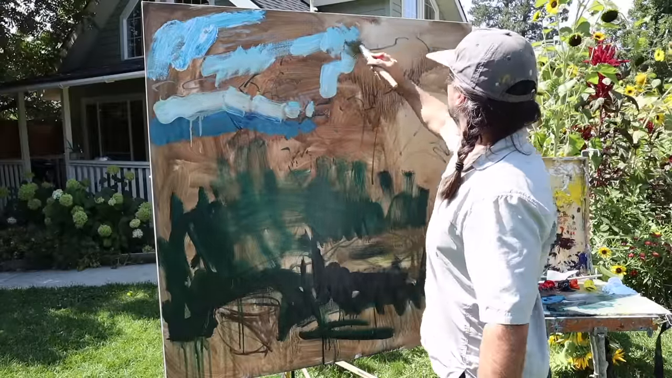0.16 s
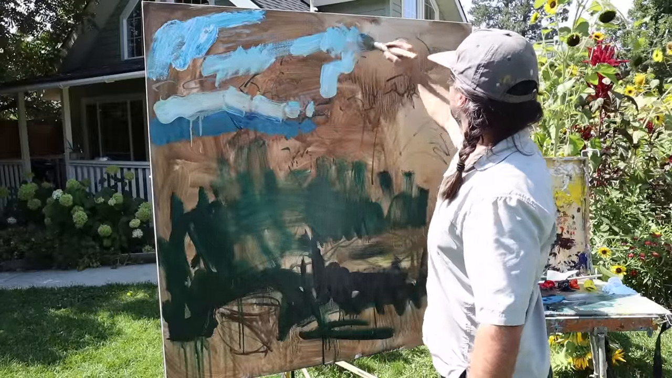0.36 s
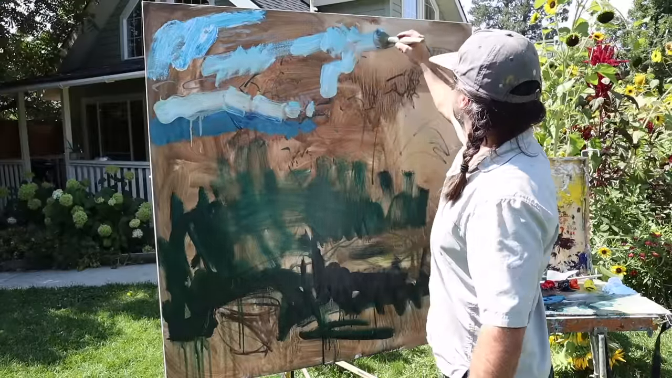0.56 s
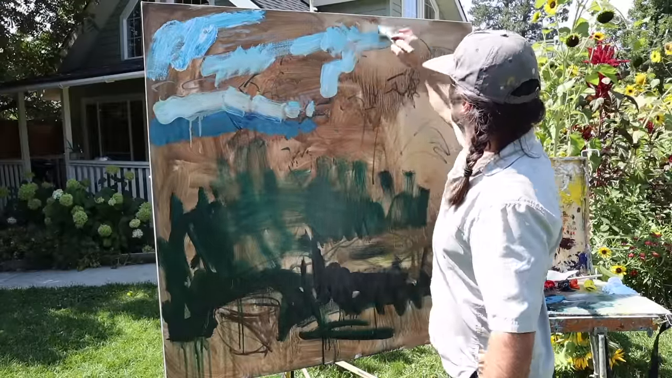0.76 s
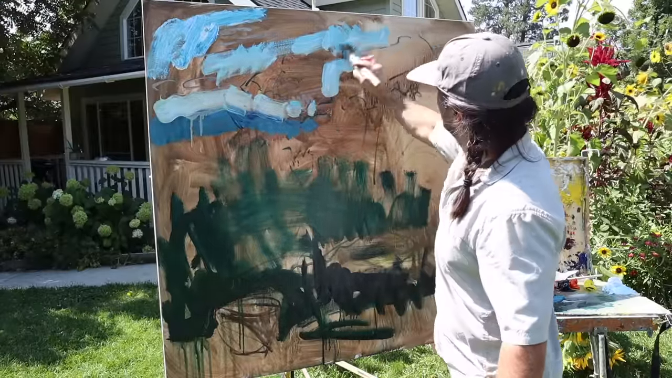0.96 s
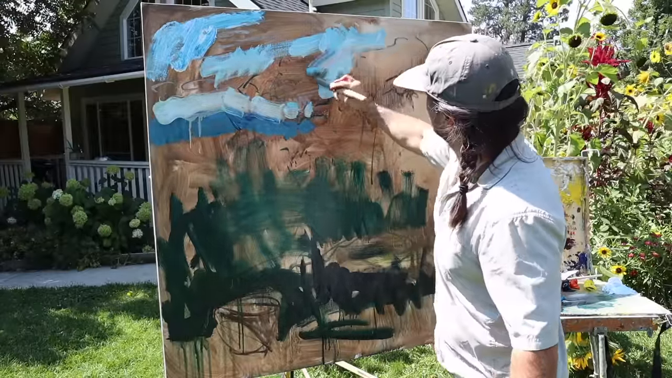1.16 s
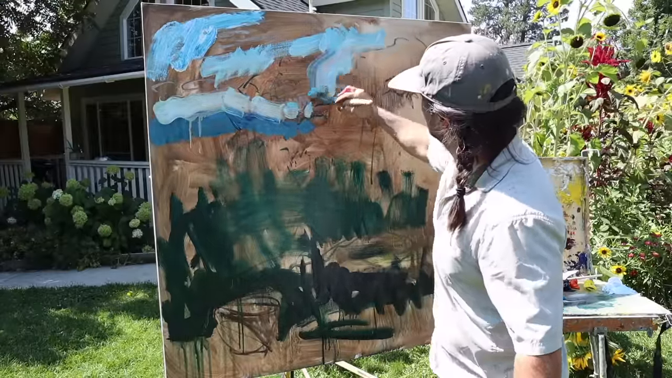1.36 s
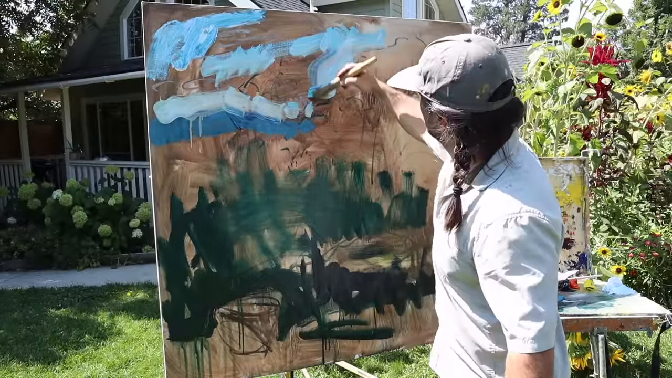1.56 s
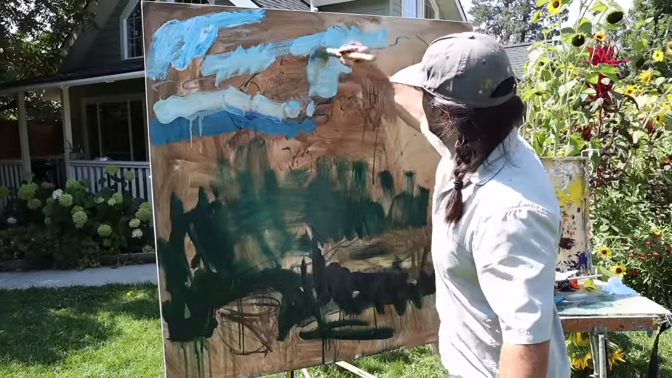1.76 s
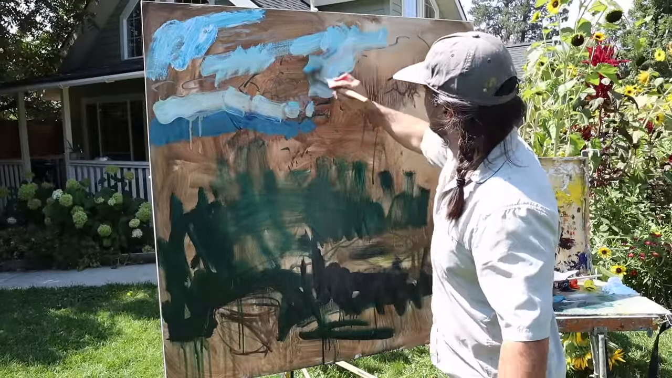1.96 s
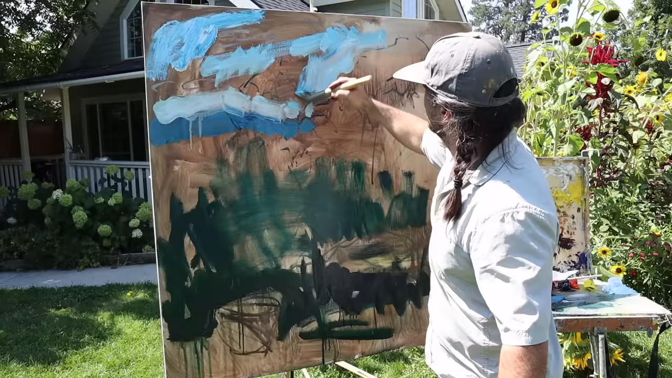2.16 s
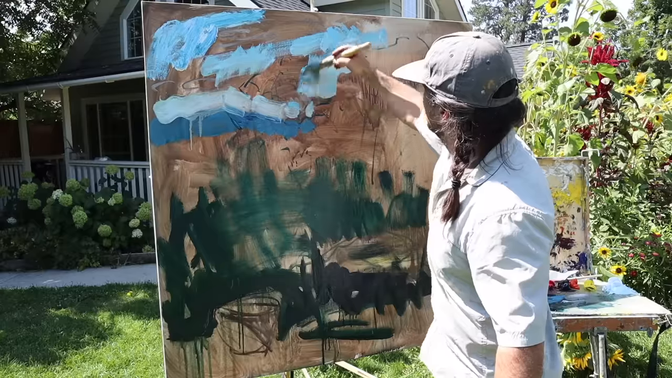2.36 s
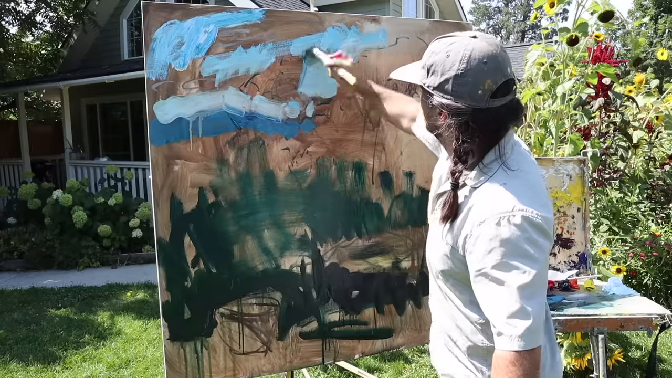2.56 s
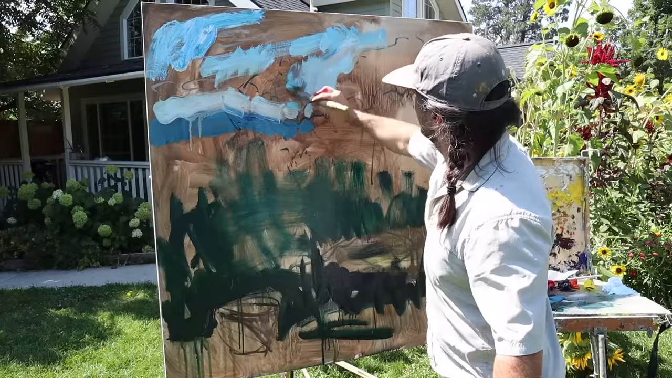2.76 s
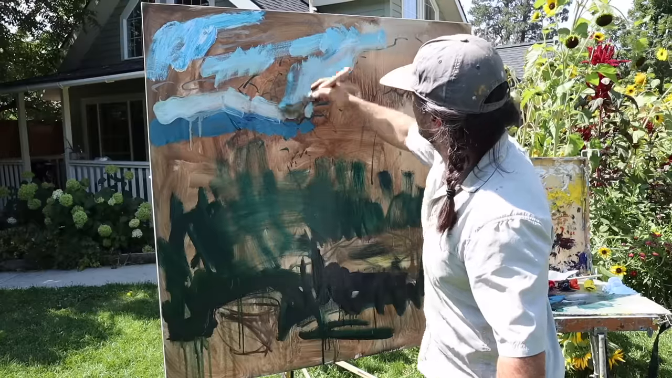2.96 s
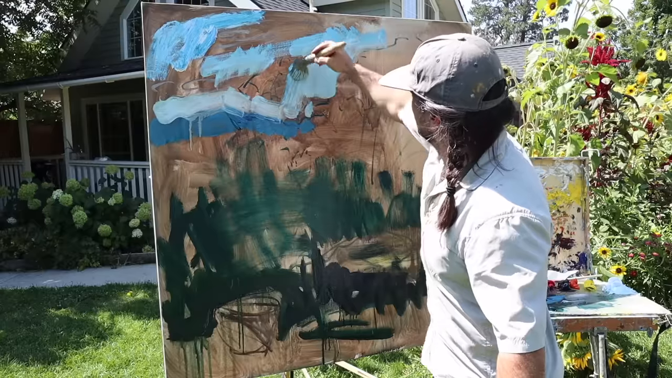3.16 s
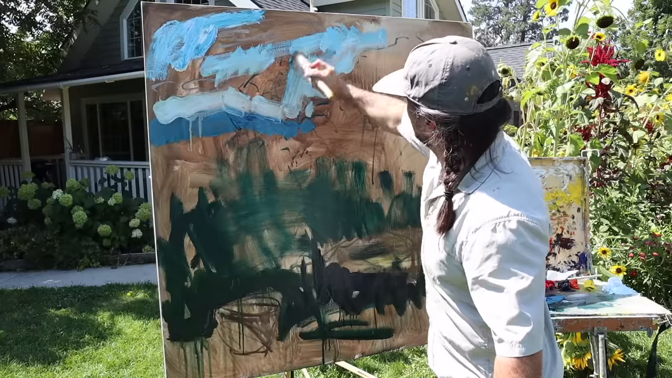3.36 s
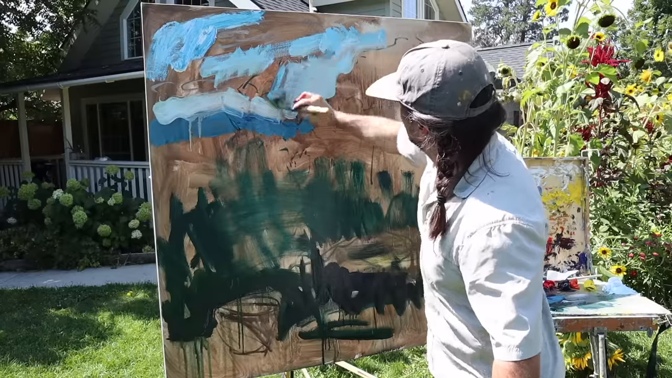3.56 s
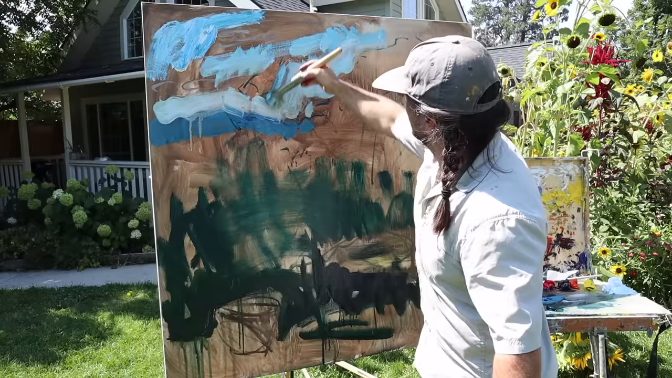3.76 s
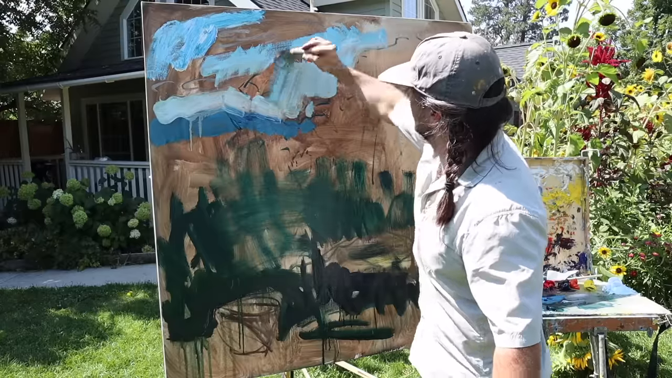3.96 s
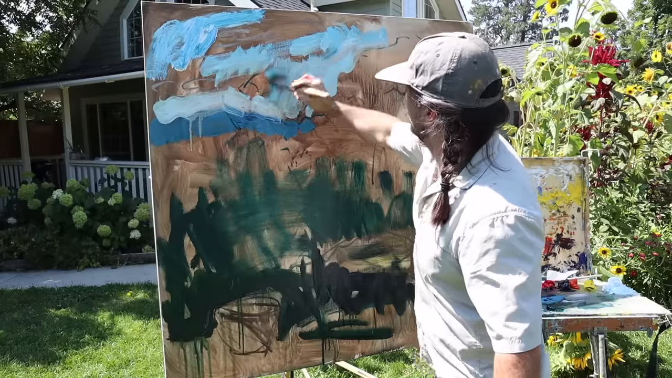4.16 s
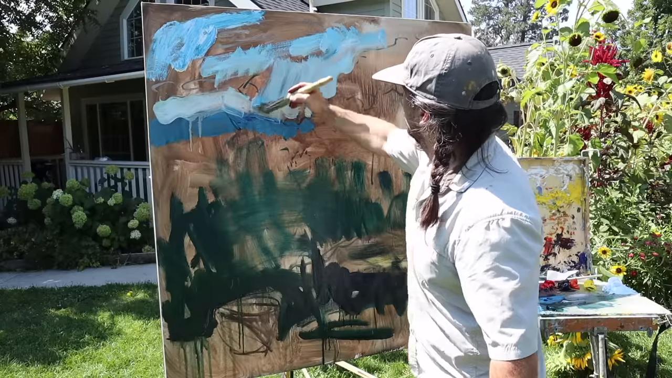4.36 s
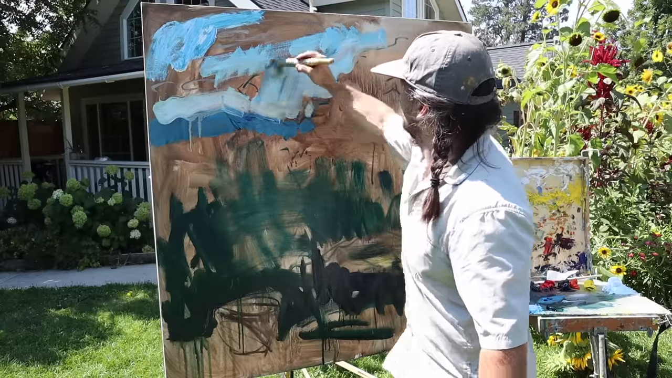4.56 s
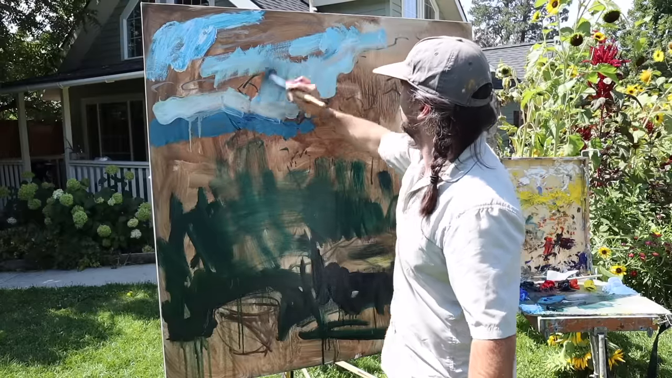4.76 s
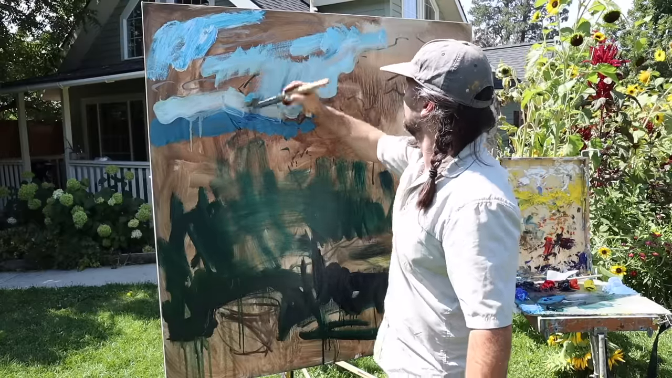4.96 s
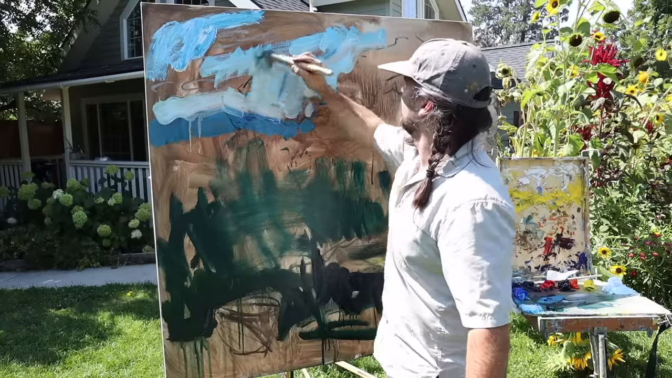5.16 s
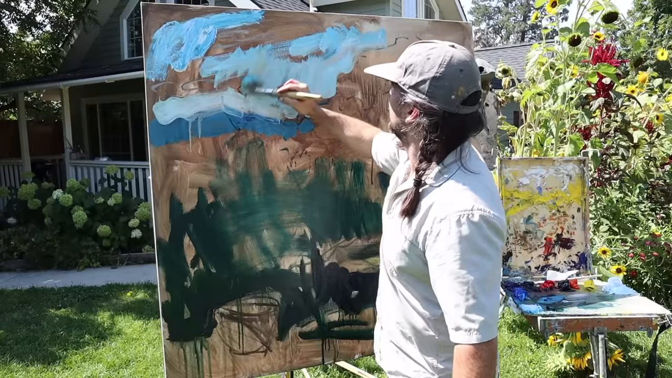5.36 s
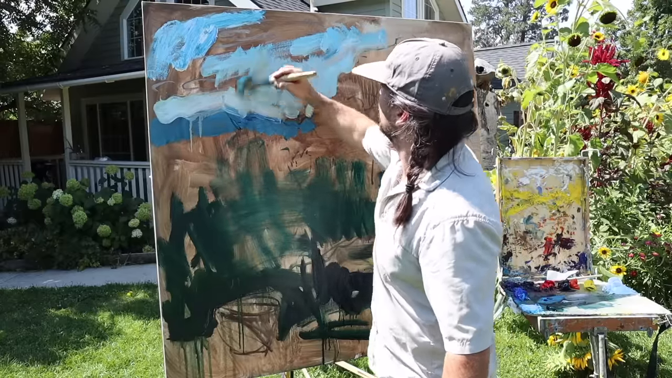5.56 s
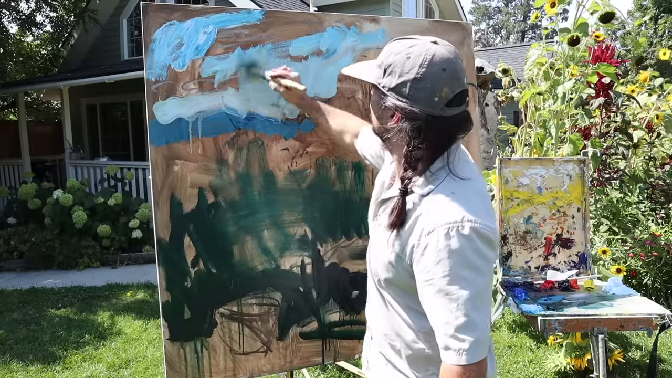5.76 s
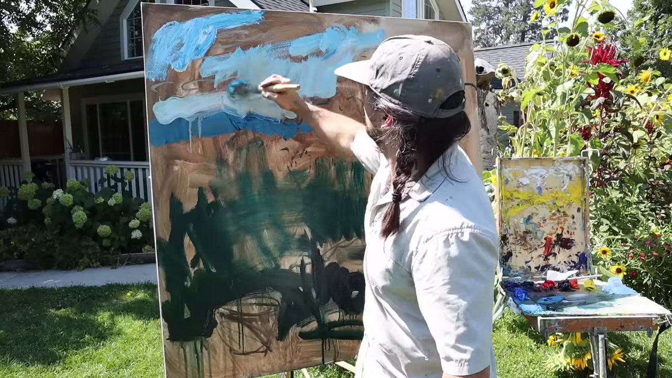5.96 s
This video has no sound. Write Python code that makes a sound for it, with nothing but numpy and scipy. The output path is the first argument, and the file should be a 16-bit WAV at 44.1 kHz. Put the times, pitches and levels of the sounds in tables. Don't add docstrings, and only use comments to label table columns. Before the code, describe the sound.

A close microphone in a quiet garden hears a stiff brush on a big stretched canvas, over a steady low hum of far traffic and soft wind rumble. From 0 to 2 seconds the strokes are feathery and faint: small dabs at 0.3 to 0.6, a light pair of swishes near 1.1, thin touches at 1.3 and 1.6. At 2.0 the brush lands more firmly; at 2.4 a short dab brings a dull low cloth thump. Rasping strokes follow at about 3.1, 3.5, 3.9 and 4.2, with soft thumps, light skims and tiny bristle ticks, while wind buffets more. Stronger, puffier strokes hit at 4.55, 4.85 and 5.13. From 5.4 to 5.9 come the loudest scrubs, dry, coarse and quick, with the wind briefly easing, then a weak final touch near 6.0.

```python
import sys
import numpy as np
from scipy import signal
from scipy.fft import rfft, irfft, next_fast_len
from scipy.io import wavfile
from scipy.ndimage import uniform_filter1d

SR = 44100
rng = np.random.default_rng(int(sys.argv[2]) if len(sys.argv) > 2 else 0)


def nominal_scale(level):
    x = np.asarray(level, float) / 20
    return 10 ** x


def file_out(sig):
    cols = np.atleast_2d(sig).T
    lim = np.clip(cols, -1, 1)
    pcm = np.round(lim * 32767).astype(np.int16)
    wavfile.write(sys.argv[1], SR, pcm)


N = 265923

# start_s [s], level_db [dB], puff_t60_s [s], rise_s [s], tip_hiss_db [dB]
LANDINGS = [(1.345, -31.5, 0.18, 0.0074, -4), (2.02, -27.5, 0.18, 0.016, -15),
            (2.414, -29, 0.053, 0.01, -7), (2.72, -22.5, 0.1, 0.013, 2), (3.130, -14.5, .1, 0.0069, -17),
            (3.488, -20, 0.086, 0.0027, -25), (3.862, -22.5, 0.1, 0.025, -10), (4.200, -26, 0.2, .003, -14),
            (4.557, -12.5, 0.17, 0.01, -20), (4.840, -17, 0.29, 0.0034, -4), (5.129, -21, .12, 0.0045, -8)]
# freq_hz [Hz], density_db [dB per Hz]
WEAVE_COLOUR = [(1400, -49), (2100, -5.5), (3000, 0), (4500, -4.5), (6000, -9), (9000, -16), (15000, -43)]
# freq_hz [Hz], density_db [dB per Hz]
TIP_COLOUR = [(2500, -17), (4500, -4), (6500, -2.5), (8100, -1), (11000, -3), (14000, -8), (17000, -14)]
# freq_hz [Hz], density_db [dB per Hz]
DRAG_COLOUR = [(600, -10), (1000, -9), (1550, 1.5), (2100, -3.5), (2800, -12.5), (4000, -67)]
# freq_hz [Hz], density_db [dB per Hz]
PANEL_COLOUR = [(120, -23), (250, 2), (500, 3.5), (900, -3), (1300, -12), (2500, -25)]
# pitch_hz [Hz], width_hz [Hz], boost_db [dB]
CANVAS_MODES = [(561, 120, 0), (850, 18, 4.5), (1170, 72, 3.5), (1580, 86, 1.5), (1702, 31, 3),
                (2610, 23, 6.5), (2820, 17, -2), (3400, 46, 0), (3545, 25, 4), (3670, 19, 1),
                (5300, 49, -1.5), (7870, 300, 2)]
PUFF_DRAG_DB, PUFF_PANEL_DB = -8.5, -28
TIP_LAG_S = 0.0021


def brush():
    *power, lean_db = strokes()
    power = np.array(power) * nominal_scale(1.4 * drift(14.5))
    for start_s, level_db, t60_s, rise_s, hiss_db in LANDINGS:
        layers_db = np.array([[0], [hiss_db], [PUFF_DRAG_DB], [PUFF_PANEL_DB]])
        puff = nominal_scale(level_db - 15.0 + layers_db) * burst(start_s, rise_s, t60_s)
        power += puff ** 2
    lag = TIP_LAG_S * SR
    power[1] = signal.lfilter([1 / lag], [1, 1 / lag - 1], power[1])
    weave = leaning(colour(slips(1.6), WEAVE_COLOUR), lean_db) * nominal_scale(-2.0)
    tips = colour(slips(2.8), TIP_COLOUR) * nominal_scale(-0.7 + 1.0 * drift(11))
    drag = colour(slips(2.86), DRAG_COLOUR) * nominal_scale(-1.0 + 1.0 * drift(5))
    panel = colour(slips(0.81), PANEL_COLOUR)
    layers = np.sqrt(power) * [weave, tips, drag, panel]
    return boost(np.sum(layers, axis=0), CANVAS_MODES)


# start_s (full contact) [s], length_s [s], rasp_db [dB],
# change_db over the stroke [dB], tip_hiss_db against the rasp [dB]
FEATHERED = [
    (0.0, 0.22, -56, 0, 0),
    (0.301, 0.037, -53, -1, 2.5),
    (0.423, 0.1, -51, -8.5, -1),
    (0.55, 0.072, -49.5, -2.3, 0.5),
    (0.628, 0.046, -55.5, 0.5, 4),
    (1.055, 0.15, -47.5, -5, 4.5),
    (1.09, 0.072, -45, -3.2, 2),
    (1.325, 0.11, -56, -3.5, 2.5),
    (1.606, 0.13, -53.5, -6, -6.5),
    (1.768, 0.079, -61, -1.5, -7),
]
PLANTED = [(2.028, .2, -47, -5.5, -4), (2.419, 0.033, -39.5, -6.5, -8), (2.79, .13, -49.5, 2.1, -0.5),
           (2.75, 0.033, -53, -2, -3), (3.134, .12, -39, -13, -7.5), (3.495, .13, -42, -.6, -3),
           (3.635, .03, -46, -3.5, -7.5), (3.9, 0.083, -47.5, 0, -4), (4.221, 0.11, -43.5, -2, 0),
           (4.563, 0.099, -34.5, -9.5, -9.5), (4.847, 0.038, -35, -0.5, -6.5),
           (4.905, 0.061, -38.5, -4.5, -1.5), (5.14, 0.073, -32.5, -2.5, -10.5)]
SCRUBBED = [
    (5.406, 0.061, -28.5, -.6, -8.5),
    (5.47, 0.027, -33, 0.5, -10),
    (5.623, 0.091, -30.5, -11.5, -10.5),
    (5.852, 0.074, -28.5, -4.5, -7.5),
    (6.025, .05, -43.5, -.6, -7),
]
# press_db_per_s [dB/s], lift_db_per_s [dB/s], graze_db under the stroke [dB],
# drag_db [dB], panel_db [dB]
HANDLING = [
    (283, 330, -32.5, -1.5, -4.5),
    (600, 414, -15, -3, -7),
    (345, 605, -29, -2.5, -6.5),
]
# start_s [s], half_width_s [s], rasp_db [dB], tip_hiss_db against it [dB]
SKIMS = [(.8, .025, -70, 7), (1.25, 0.056, -62, 8), (1.56, .04, -65.5, -2), (1.71, 0.028, -53.5, -11),
         (1.99, 0.055, -59.5, -10), (2.385, 0.056, -55.5, -10), (2.54, 0.09, -60.5, 1),
         (2.718, .022, -49, -6), (2.64, .05, -63, -16), (2.97, .03, -56, -17), (3.05, .03, -60, -10),
         (3.105, 0.032, -53.5, -5), (3.31, 0.054, -59, 0), (3.45, 0.044, -60.5, -7), (3.7, 0.074, -59, -4),
         (3.84, 0.071, -52.5, -9), (4.02, 0.039, -56.5, 1), (4.11, 0.056, -60, -8), (4.4, 0.087, -60.5, -2),
         (4.53, 0.043, -52.5, -8), (4.69, 0.046, -52, -0.5), (4.81, 0.065, -56.5, -3),
         (5.07, 0.04, -55, 1.5), (5.24, 0.03, -46.5, -4), (5.31, 0.042, -55.5, 0), (5.585, 0.036, -43, -4),
         (5.728, 0.022, -51, -3)]
# start_s [s], tilt_db from flat and coarse to tips only [dB], push_db into the cloth [dB]
TILT = [(0, -3, 4), (1.1, -3, -0.2), (1.7, -4, 3), (2.1, 1.5, 1.8), (2.43, -2.5, -0.2), (2.8, 3, 1.7),
        (3.14, 0.5, -0.5), (3.55, 0, -0.5), (3.9, -2, -2), (4.27, 0, 3.4), (4.6, 5, -1), (4.9, 1, -1.5),
        (5.18, -8.5, -1.8), (5.45, 0.5, -3.5), (5.62, -2.5, -1), (5.72, -11.5, 3), (5.84, 1.5, -1.1),
        (6.03, -1, 4)]
APPROACH_DB_PER_S, TRAIL_DB_PER_S = 248, 80
GRAZE_HISS_DB, GRAZE_DRAG_DB, GRAZE_PANEL_DB = -11, 1.5, 1
SAG_CURVE = 1.37
SPEED_HISS_DB, SPEED_LEAN_DB = -1, 9.5
DRAG_PER_TILT, PANEL_PER_TILT, DRAG_PER_PUSH = -0.31, -0.14, 0.4


def strokes():
    t = np.arange(0, N / SR + .001, .0005)
    out = np.zeros((5, len(t)))
    for kind, (press, lift, graze_db, drag_db, panel_db) in zip((FEATHERED, PLANTED, SCRUBBED), HANDLING):
        for start_s, length_s, rasp_db, change_db, hiss_db in kind:
            done = np.clip((t - start_s) / length_s, 0, 1)
            early = np.maximum(start_s - t, 0)
            late = np.maximum(t - start_s - length_s, 0)
            level_db = rasp_db + change_db * done ** SAG_CURVE
            firm = nominal_scale(2 * (level_db - press * early - lift * late))
            graze = nominal_scale(2 * (level_db + graze_db - APPROACH_DB_PER_S * early - TRAIL_DB_PER_S * late))
            sliding = nominal_scale(2 * (SPEED_HISS_DB * (done - .5)))
            out[0] += firm + graze
            out[1] += nominal_scale(2 * hiss_db) * (firm * sliding + graze * nominal_scale(2 * GRAZE_HISS_DB))
            out[2] += firm * nominal_scale(2 * drag_db) + graze * nominal_scale(2 * GRAZE_DRAG_DB)
            out[3] += firm * nominal_scale(2 * panel_db) + graze * nominal_scale(2 * GRAZE_PANEL_DB)
            out[4] += (firm + graze) * SPEED_LEAN_DB * done
    for start_s, half_width_s, rasp_db, hiss_db in SKIMS:
        layers_db = rasp_db + np.array([[0], [hiss_db], [GRAZE_DRAG_DB], [GRAZE_PANEL_DB]])
        out[:4] += nominal_scale(2 * layers_db) * np.exp(-2 * ((t - start_s) / half_width_s) ** 2)
    held_s, tilts, pushes = np.transpose(TILT)
    tilt_db = np.interp(t, held_s, tilts)
    push_db = np.interp(t, held_s, pushes)
    by_tilt = np.outer([DRAG_PER_TILT, PANEL_PER_TILT], tilt_db + 6.5)
    by_push = np.outer([DRAG_PER_PUSH, 1], push_db)
    out[2:4] *= nominal_scale(2 * by_tilt + 2 * by_push)
    out[4] = tilt_db + out[4] / (out[0] + 1e-30)
    return [np.interp(np.arange(N) / SR, t, row) for row in out]


def slips(spread_db):
    slips_per_s = 9000
    sizes = nominal_scale(spread_db * np.minimum(rng.exponential(1, N), 4)) * rng.choice([-1, 1], N)
    return sizes * (rng.random(N) < slips_per_s / SR)


def leaning(x, lean_db):
    weave_centre_hz = 3600
    low = signal.sosfiltfilt(signal.butter(2, weave_centre_hz, fs=SR, output="sos"), x)
    high = x - low
    return low * nominal_scale(-lean_db / 2 + 1.4 * drift(45)) + high * nominal_scale(lean_db / 2 + 0.9 * drift(45))


# start_s [s], level_db [dB], pitch_hz [Hz], t60_s [s], panel_rustle_db [dB]
THUMPS = [
    (2.034, -35.5, 167, 0.062, -43.5),
    (2.421, -19, 121, 0.035, -50),
    (2.72, -45, 180, .07, -50),
    (3.124, -25, 245, 0.028, -38.5),
    (3.874, -27, 210, 0.058, -38.5),
    (4.204, -29.5, 140, 0.079, -38.5),
    (4.545, -37, 149, .07, -42.5),
    (4.841, -35, 179, 0.094, -40),
    (5.136, -30.5, 232, 0.072, -40),
]
RUSTLE_RISE_S, RUSTLE_T60_S = .008, 0.15


def thumps():
    out = np.zeros(N)
    rustle = colour(slips(1.7), PANEL_COLOUR)
    for start_s, level_db, pitch_hz, t60_s, rustle_db in THUMPS:
        push = np.diff(burst(start_s, 0.0027, 0.016), prepend=0) * nominal_scale(level_db)
        out += ring(push, pitch_hz, t60_s)
        out += nominal_scale(-14) * ring(push, 2.3 * pitch_hz, 0.5 * t60_s)
        out += nominal_scale(rustle_db) * rustle * burst(start_s, RUSTLE_RISE_S, RUSTLE_T60_S)
    return out


# start_s [s], level_db [dB], pitch_hz [Hz], t60_s [s]
FLICKS = [(1.2974, -40, 4580, 0.028), (1.4094, -46, 3250, 0.03), (1.6893, -42, 2870, 0.03),
          (1.715, -43, 2690, 0.03), (2.978, -39.5, 2800, 0.024), (2.9981, -38, 3330, 0.019),
          (3.1345, -26, 3400, 0.026), (3.7117, -40, 2890, 0.03), (4.041, -39.5, 2700, 0.03),
          (4.2025, -37, 3000, 0.046), (4.391, -40, 3090, 0.03), (4.8433, -32, 3300, 0.03),
          (5.0448, -40.5, 2970, 0.038), (5.286, -33, 3400, 0.03), (5.316, -44, 7500, 0.03),
          (5.5332, -36.5, 3230, 0.036)]


def flicks():
    crackle = rng.standard_normal(N)
    out = np.zeros(N)
    for start_s, level_db, pitch_hz, t60_s in FLICKS:
        spray = nominal_scale(-17.5) * crackle * burst(start_s, 0.0012, t60_s)
        spray[int((start_s + .001) * SR)] += 1
        snap = ring(spray, .7 * pitch_hz, 0.0012) - ring(spray, 1.45 * pitch_hz, 0.0006)
        snap += nominal_scale(-12) * ring(spray, 10000, 0.00041)
        out += nominal_scale(level_db + 5) * snap / np.abs(snap).max()
    return out


# start_s (peak) [s], level_db [dB], half_width_s [s]
GUSTS = [(.04, -47, 0.076), (.2, -57, 0.057), (.96, -58, 0.063), (1.33, -56, 0.035), (1.54, -56, .04),
         (1.78, -55, 0.11), (2.1, -48, .03), (2.18, -45, 0.065), (2.34, -40, 0.067), (2.5, -43, 0.039),
         (2.69, -38.5, 0.059), (2.9, -46.5, 0.11), (3.31, -42, 0.1), (3.44, -55, 0.055), (3.68, -50, 0.16),
         (3.91, -44, 0.031), (4.01, -43, 0.052), (4.2, -41, 0.09), (4.37, -44, 0.09), (4.54, -35.5, 0.068),
         (4.73, -40.5, 0.076), (4.85, -37, .03), (4.94, -36, 0.04), (5.05, -44, .04), (5.12, -39.5, 0.058),
         (5.4, -52, 0.19), (5.63, -52, 0.059), (5.81, -42, 0.034), (5.93, -42.5, 0.087)]
# freq_hz [Hz], density_db [dB per Hz]
BUFFET_COLOUR = [(15, -40), (32, -12.5), (50, -4.5), (72, 0.5), (100, -6), (160, -33)]
# freq_hz [Hz], density_db [dB per Hz]
FLUTTER_COLOUR = [(50, -12.5), (95, -6.5), (130, 1), (190, -3.5), (280, -14.5), (450, -25)]
CALM_DB, FLUTTER_DB = -63, -47.5
FLUTTER_FOLLOWS = 0.14


def wind():
    t = np.arange(N) / SR
    gust = np.full(N, nominal_scale(CALM_DB))
    for start_s, level_db, half_width_s in GUSTS:
        gust += nominal_scale(level_db) * np.exp(-((t - start_s) / half_width_s) ** 2)
    buffet = gust * steadied(colour(rng.standard_normal(N), BUFFET_COLOUR), size=2600)
    flutter = nominal_scale(FLUTTER_DB + 1.6 * drift(13.6)) * (gust / nominal_scale(-41.5)) ** FLUTTER_FOLLOWS
    return buffet + flutter * steadied(colour(rng.standard_normal(N), FLUTTER_COLOUR), size=1800)


def steadied(x, size):
    return rms_one(x / (uniform_filter1d(x ** 2, size=size) + .1) ** 0.18)


# freq_hz [Hz], density_db [dB per Hz]
GARDEN_COLOUR = [(40, -5), (100, 0), (200, -6), (400, -8), (900, -13.5), (2000, -22), (4000, -26),
                 (6000, -31), (10000, -33.5), (17000, -39)]
GARDEN_DB = -48.5


def garden():
    return nominal_scale(GARDEN_DB + 0.69 * drift(1.0)) * colour(rng.standard_normal(N), GARDEN_COLOUR)


def rms_one(x):
    return x / np.sqrt(np.mean(x ** 2) + 1e-20)


def colour(x, points):
    hz, db = np.transpose(points)
    size = next_fast_len(N)
    bins = np.maximum(np.fft.rfftfreq(size, 1 / SR), 1)
    gain = nominal_scale(np.interp(np.log(bins), np.log(hz), db, left=-90, right=-90))
    return rms_one(irfft(rfft(x, size) * gain, size)[:N])


def drift(rate_hz):
    r = np.exp(-2 * np.pi * rate_hz / SR)
    slow = signal.lfilter([1], [1, -2 * r, r * r], rng.standard_normal(N + SR))[SR:]
    return rms_one(slow - slow.mean())


def ring(clicks, pitch_hz, t60_s):
    r = nominal_scale(-60 / (t60_s * SR))
    w = 2 * np.pi * pitch_hz / SR
    return signal.lfilter([0, np.sin(w)], [1, -2 * r * np.cos(w), r * r], clicks + 1e-18)


def burst(start_s, rise_s, t60_s):
    t = np.arange(N) / SR - start_s
    return np.clip(t / rise_s, 0, 1) * nominal_scale(-60 * np.maximum(t - rise_s, 0) / t60_s)


def boost(x, peaks):
    for hz, width_hz, db in peaks:
        x = x + (nominal_scale(db) - 1) * signal.lfilter(*signal.iirpeak(hz, hz / width_hz, fs=SR), x)
    return x


def scene():
    return np.tile(brush() + thumps() + flicks() + wind() + garden(), (2, 1))


def band_limit(x):
    return signal.sosfilt(signal.butter(12, 15740, fs=SR, output="sos"), x)


# pitch_hz [Hz], width_hz [Hz], boost_db [dB]
PORT_PRESENCE = [(3490, 860, 4.5)]
# freq_hz [Hz], density_db [dB per Hz]
SIDE_HISS_COLOUR = [(250, -8), (400, 5), (800, 1), (1500, -1.5), (6000, -4), (10000, -6.5), (13000, -1.5),
                    (17000, 2.5)]
CUTOFF_HZ = 15750


def record(dry):
    thinned = signal.sosfilt(signal.butter(2, 28.0, "high", fs=SR, output="sos"), dry)
    heard = boost(thinned, PORT_PRESENCE)
    hiss = nominal_scale(-80.0) * colour(rng.standard_normal(N), SIDE_HISS_COLOUR)
    edge = signal.ellip(10, .1, 60, CUTOFF_HZ, fs=SR, output="sos")
    mix = signal.sosfilt(edge, heard + hiss * [[1], [-1]])
    return band_limit(mix)


dry = scene()
out = record(dry)
file_out(out)
```